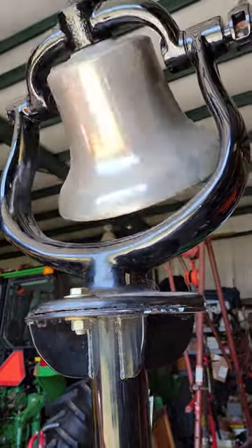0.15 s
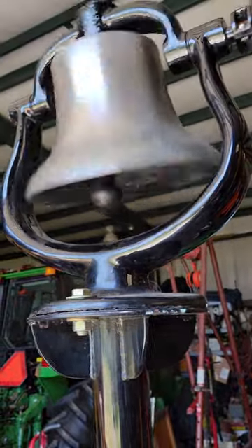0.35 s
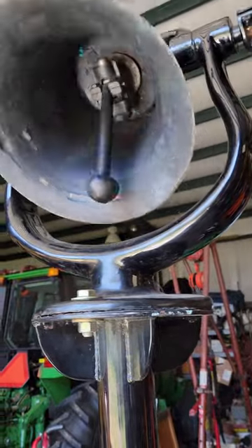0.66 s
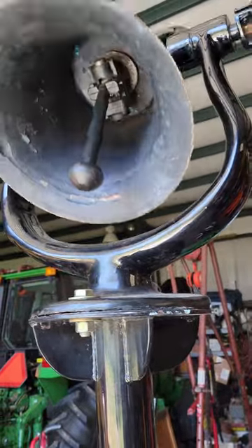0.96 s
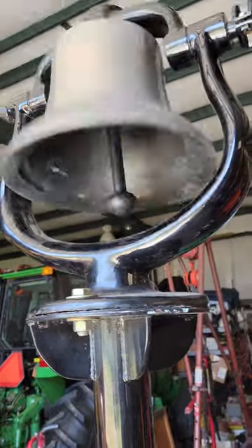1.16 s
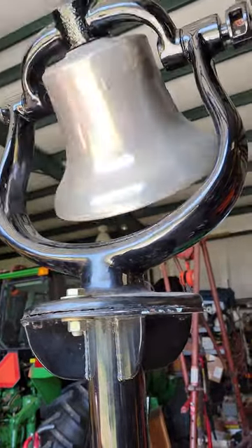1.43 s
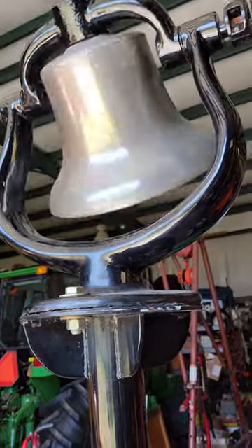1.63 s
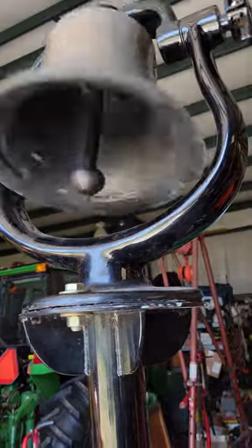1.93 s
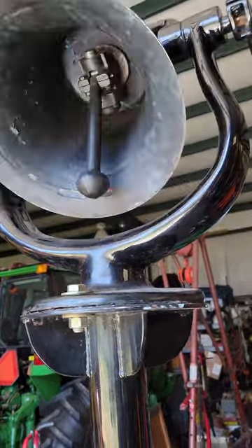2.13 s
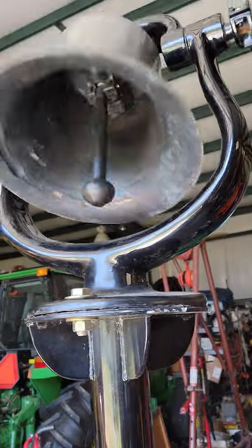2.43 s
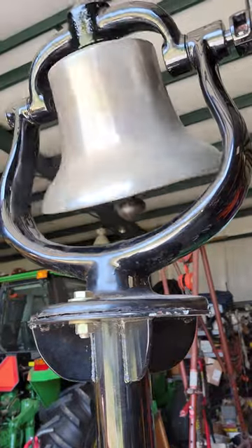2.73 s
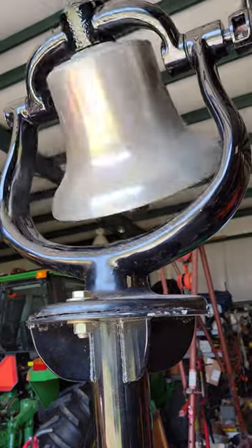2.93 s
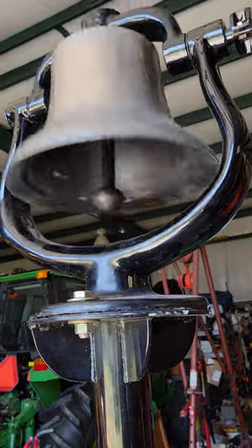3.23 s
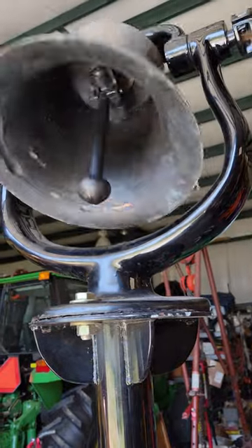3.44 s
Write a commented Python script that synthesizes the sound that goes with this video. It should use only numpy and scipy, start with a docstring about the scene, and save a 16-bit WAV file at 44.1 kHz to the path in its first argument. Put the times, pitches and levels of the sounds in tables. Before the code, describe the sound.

A metal bell tolls in a shed, two cracking clapper blows over a long wavering ring

```python
"""A cast metal bell swings in its yoke in a shed, close to the two microphones of a phone.
An earlier blow still rings: close pairs of partials beat, and their lobes sweep past as the mouth tilts.
Pivots tick and clunk, a loose part pings, then the clapper strikes with a crack and the yoke thuds.
The clapper touches again, faintly, and some low pairs dip; more ticks, a second blow, and it rings on.
Shaped noise makes the shed's faint hum, the cracks and the clunks; decaying sines make the rest."""
import sys
import numpy as np
from scipy import signal
from scipy.fft import rfft, irfft
from scipy.io import wavfile
from scipy.ndimage import uniform_filter1d

SR = 44100
rng = np.random.default_rng(int(sys.argv[2]) if len(sys.argv) > 2 else 0)


def store_wav(level_fs):
    """Save 16-bit WAV to argv[1]."""
    pcm = np.round(np.clip(np.atleast_2d(level_fs), -1, 1) * 32767)
    wavfile.write(sys.argv[1], SR, pcm.T.astype(np.int16))


def makeup_ratio(level_db):
    """Linear amplitude ratio for a level in decibels (20 dB per factor of ten)."""
    decades = np.asarray(level_db, float) / 20
    return 10 ** decades


N = 157878

# clapper blows, the first before the start: start_s, strength_db
BLOWS = [(-.66, 0), (.7975, 0), (2.2815, 0)]


def noise(points, size):
    """Two unrelated noises coloured by (Hz, relative dB) points, scaled to rms 1."""
    point_hz, point_db = np.array(points, float).T
    bin_hz = np.arange(size // 2 + 1) * SR / size + 1  # 1 Hz up, so that the log exists
    colour = makeup_ratio(np.interp(np.log(bin_hz), np.log(point_hz), point_db))
    pair = irfft(rfft(rng.standard_normal((2, size))) * colour, size)
    return pair / pair.std()


def fade(t60, size):
    """Exponential decay, 60 dB down after t60 seconds."""
    return makeup_ratio(-60 * np.arange(size) / SR / t60)


def waver(size, order):
    """Gain that wanders at random around 1; a longer order (samples) gives longer swells."""
    depth = 0.8
    slow = uniform_filter1d(uniform_filter1d(rng.standard_normal(size), order), order)
    return 1 + depth * slow / slow.std()


def add(out, sound, start_s):
    """Mix a sound in at start_s, cut at the end of the scene."""
    i = int(start_s * SR)
    out[:, i:i + sound.shape[1]] += sound[:, :N - i]


def microphones(mid_side, side_hz):
    """Mid and side to left and right; the side loses its bass, which is alike at both microphones."""
    high_pass = signal.butter(1, side_hz, "high", fs=SR, output="sos")
    side = signal.sosfilt(high_pass, mid_side[1])
    return mid_side[0] + side * np.array([[1], [-1]])


def shed_echo(sound):
    """Diffuse echo of roof and walls: a fading noise tail, dull in the treble."""
    size, t60_s, gain_db = 32768, 0.31, -5
    tail = noise([(200, 0), (4000, -3), (16000, -24)], size) * fade(t60_s, size)
    tail[:, :200] = 0  # samples before the first reflection
    tail /= np.sqrt((tail ** 2).sum(axis=1, keepdims=True))
    return signal.fftconvolve(sound, tail, axes=1)[:, :N] * makeup_ratio(gain_db)


def shed_air():
    """Faint steady hum of the shed: coloured noise with a narrow bass."""
    # colour of the air: frequency_hz, relative_db
    air_colour = [(25, -19), (45, -11.5), (70, 3), (120, -5.5), (260, -9.5), (305, -1.5), (350, -9.5),
                  (700, -19.5), (1300, -19.5), (2200, -25), (4000, -36), (7000, -53.5), (12000, -58.5)]
    level_db, side_hz = -62.5, 150
    return makeup_ratio(level_db) * microphones(noise(air_colour, N), side_hz)


def struck_modes(modes, t60, size):
    """Wavering struck modes: strength varies by touch, phase also between mid and side."""
    scatter_db = 2.5
    mode_hz, mode_db = np.array(modes, float).T[:, :, None, None]
    phase = rng.random((len(modes), 2, 1))
    scatter = rng.standard_normal((len(modes), 1, 1))
    sines = np.sin(2 * np.pi * (mode_hz * np.arange(size) / SR + phase))
    tones = makeup_ratio(mode_db + scatter_db * scatter) * sines
    return sum(tone * waver(size, order=300) for tone in tones) * fade(t60, size)


def contact_rise(size):
    """Linear onset of a contact, over 2.4 ms."""
    return np.minimum(np.arange(size) / SR / 0.0024, 1)


def yoke_pings(out):
    """A loose part of the yoke pings and rings at a few modes."""
    # pings: start_s, level_db
    ping_times = [(.684, -61), (1.502, -69), (2.068, -67.5), (3.454, -69.5)]
    # modes of the loose part: frequency_hz, relative_db
    ping_modes = [(4810, -1), (7100, -0.5), (10200, -9)]
    size, t60_s = 8192, 0.2
    for start_s, level_db in ping_times:
        ping = struck_modes(ping_modes, t60_s, size)
        add(out, makeup_ratio(level_db) * ping * contact_rise(size), start_s)


def pivot_ticks(out):
    """At each touch the pivot's modes tick, its surfaces grate, and a duller noise clunks."""
    # touches of the pivots: start_s, tick_db, clunk_db
    touches = [(0.09, -59, -59), (0.683, -54.5, -56.5), (0.694, -49.5, -46.5), (1.109, -50.5, -49.5),
               (1.488, -59, -56), (2.051, -78, -52.5), (2.121, -59.5, -56), (2.144, -59, -61),
               (2.929, -59, -60), (3.049, -71, -59.5), (3.43, -68, -50.5)]
    # modes of the pivot: frequency_hz, relative_db
    pivot_modes = [(3260, 1), (5050, 2.5), (5810, -6), (7400, -6), (9200, -9)]
    # colour of the grating: frequency_hz, relative_db
    grit_colour = [(1800, -24.5), (5000, 0), (9000, -25)]
    # colour of the clunk: frequency_hz, relative_db
    clunk_colour = [(400, -55), (600, -25), (850, 0.5), (1250, 0), (1550, -26.5), (2060, -5.5),
                    (2500, -29.5), (4000, -60)]
    size = 8192
    tick_t60_s, grit_t60_s, clunk_t60_s = 0.04, 0.091, 0.3
    grit_db = -4  # below the tick level
    rise = contact_rise(size)
    for start_s, tick_db, clunk_db in touches:
        grit = makeup_ratio(grit_db) * noise(grit_colour, size) * fade(grit_t60_s, size)
        tick = struck_modes(pivot_modes, tick_t60_s, size) + grit
        clunk = noise(clunk_colour, size) * fade(clunk_t60_s, size)
        add(out, makeup_ratio(tick_db) * tick * rise, start_s)
        add(out, makeup_ratio(clunk_db) * clunk * rise, start_s)


def yoke_thuds(out):
    """Yoke and post answer each blow with low, wavering tones, alike at both microphones."""
    # tones of yoke and post: frequency_hz, level_db (before the waver), t60_s
    yoke_tones = [(91, -44.5, 0.72), (195.4, -44.5, 0.45), (302.6, -46.5, 0.65)]
    size, rise_s = SR // 2, 0.006
    age = np.arange(size) / SR
    for start_s, strength_db in BLOWS[1:]:
        thud = np.zeros(size)
        for tone_hz, level_db, t60_s in yoke_tones:
            tone = makeup_ratio(level_db) * np.sin(2 * np.pi * tone_hz * age)
            thud += tone * fade(t60_s, size) * waver(size, order=900)
        thud *= makeup_ratio(strength_db) * (1 - np.exp(-age / rise_s))
        add(out, np.array([thud, 0 * thud]), start_s)  # mid only


def clapper_cracks(out):
    """The clapper's contact at each blow: a short burst of coloured noise."""
    # colour of the crack: frequency_hz, relative_db
    crack_colour = [(100, -44), (290, -1), (500, -16.5), (1200, 3.5), (2200, -4), (3000, -12), (4200, -9),
                    (6300, -2), (8300, -20.5), (12000, -18.5), (16000, -22)]
    size, level_db, t60_s = 8192, -11.5, 0.035
    for start_s, strength_db in BLOWS[1:]:
        crack = noise(crack_colour, size) * fade(t60_s, size)
        add(out, makeup_ratio(strength_db + level_db) * crack * np.sqrt(contact_rise(size)), start_s)


def knocks():
    """All knocks of pivots, yoke and clapper as mid and side, with their echo, at the microphones."""
    echo_db, side_hz = -10, 600
    hits = np.zeros((2, N))
    yoke_pings(hits)
    pivot_ticks(hits)
    yoke_thuds(hits)
    clapper_cracks(hits)
    return microphones(hits + makeup_ratio(echo_db) * shed_echo(hits), side_hz)


def swarm(count):
    """Weak partials crowding the treble, shorter the higher: (Hz, dB before upper_ring's gain, t60 s)."""
    low_hz, high_hz = 3695, 15500
    top_db, tilt_db_per_octave, low_t60_s = -54.5, -0.5, 1.3
    place, weakness = rng.random((count, 2)).T
    partial_hz = low_hz + place * (high_hz - low_hz)
    partial_db = top_db + tilt_db_per_octave * np.log2(partial_hz / low_hz) - 8 * weakness
    return list(zip(partial_hz, partial_db, low_t60_s * low_hz / partial_hz))


def upper_ring(t, tilt):
    """Fast-fading beating pairs, with more lobes the higher they are."""
    # pitches of the upper partials: pitch_hz
    upper_hz = [1578.8, 2054, 2254, 2535, 2589.5, 2589, 2673, 2701, 3230, 3416, 3553.5, 3572, 3919, 4065,
                4260, 4360, 4452, 4619.5, 4638, 5069, 5755, 5793, 6060, 6304, 6375, 6340, 6944, 6988, 7391,
                7927, 8175, 9270, 9421, 9911, 10750, 12110, 12400, 13375, 14080]
    # the same partials: level_db (before gain_db and the blow), t60_s (until the clapper rests)
    upper_decays = [(-51.5, 3), (-41.5, 0.62), (-41.5, 0.31), (-48.5, 2.2), (-33.5, 1.61), (-58.5, 5.2),
                    (-46, 1), (-43.5, .74), (-59, 0.42), (-47.5, 1.3), (-29, 1.06), (-39, 1.21),
                    (-55.5, 0.67), (-50, 1.2), (-45.5, 1), (-49, 0.9), (-46, 1.1), (-31, .94), (-47, 1.3),
                    (-53.5, 0.41), (-38.5, .65), (-35, 0.95), (-53, 1.3), (-46, 1), (-45, .8), (-29, 0.23),
                    (-52.5, 0.58), (-46, .73), (-60.5, 0.73), (-56.5, 0.85), (-57, 0.91), (-59.5, 0.91),
                    (-53, .52), (-42, 0.32), (-56, 0.39), (-63, .56), (-59, .47), (-28.5, 0.15), (-35, .2)]
    # the clapper touches again: start_s, strength_db
    rebounds = [(1.11, -32)]
    gain_db, rise_s = 12.5, 0.0028
    split_share = 0.001986  # pair spacing over pitch, before a random factor
    lobes_per_khz, lobe_fill = 2.315, 0.51  # lobe phase in radians per unit tilt; partner's share
    rest_s, free_damp = 0.7, 0.65  # the clapper leans on the bell, then the decay slows to this share
    partials = [(pitch_hz, *row) for pitch_hz, row in zip(upper_hz, upper_decays)]
    out = np.zeros((2, N), np.float32)
    for pitch_hz, partial_db, t60_s in partials + swarm(count=90):
        db_per_s = 60 / t60_s
        split_hz = split_share * pitch_hz * (0.32 + rng.random())
        lobe_turn = rng.random((2, 1))
        for start_s, strength_db in BLOWS + rebounds:
            beat_turn = rng.random((2, 1))
            i = max(int(start_s * SR), 0)
            age = t[i:] - start_s
            damped_s = np.minimum(age, rest_s) + free_damp * np.maximum(age - rest_s, 0)
            level_db = partial_db + strength_db + gain_db - db_per_s * damped_s
            n = np.searchsorted(-level_db, 100)  # stop at -100 dB
            age = age[:n]
            phase = (2 * np.pi * pitch_hz * age % (2 * np.pi)).astype(np.float32)
            lobe = lobes_per_khz * pitch_hz / 1000 * tilt[i:i + n] + 2 * np.pi * lobe_turn
            lobe = lobe.astype(np.float32)
            beat = (2 * np.pi * (split_hz * age + beat_turn)).astype(np.float32)
            loud = (makeup_ratio(level_db[:n]) * (1 - np.exp(-age / rise_s))).astype(np.float32)
            pair = np.cos(lobe) * np.sin(phase) + lobe_fill * np.sin(phase + beat)
            out[:, i:i + n] += loud * pair
    return out


def low_ring(t, tilt):
    """Four loud beating pairs; each member's lobes follow the tilt by a cubic through four points."""
    # low pairs: main_hz, partner_offset_hz, decay_db_per_s, diffuse_amplitude (signed),
    # right_beat_later_s, right_phase_cycles
    low_pairs = [(507.6, 3.82, .3, .001, .087, .04), (975.6, 2.73, 2.5, .001, .198, .83),
                 (1103.5, -2.96, 1.0, -.0334, .004, .4), (1753.3, 3.52, 25.6, .056, .005, .24)]
    # one row a blow, ring level of the four pairs: pair1_db, pair2_db, pair3_db, pair4_db
    ring_levels = [(0, -2, 1, 0.085), (3, -0.5, 1, -0.82), (-2, -6.5, -0.26, -1.1)]
    # one row a blow, time of a beat crest (left): pair1_s, pair2_s, pair3_s, pair4_s
    beat_crests = [(.124, .007, .26, .273), (.996, 1.083, 1.022, 1.062), (2.374, 2.537, 2.48, 2.365)]
    # signed lobe amplitude at four tilts: at_1, at_0.5, at_-0.5, at_-1
    # rows of each pair: left main, left partner, right main, right partner
    lobe_points = [(-0.0164, 0.0094, -0.0012, -0.0017), (-0.0075, 0.045, 0.11, 0.099),
                   (0.0074, -0.0054, 0.0011, -0.0004), (-0.032, -0.0136, -0.027, -0.036),
                   (0.17, 0.021, 0.17, 0.12), (0.0348, 0.0114, 0.0274, 0.11), (0.11, 0.034, 0.071, 0.14),
                   (-0.0267, -0.0116, -0.0145, -0.04), (0.037, 0.029, -0.094, -0.081),
                   (0.07, 0.061, 0.0077, 0.11), (0.087, -0.074, 0.15, 0.11), (-0.045, -0.13, -0.017, -0.12),
                   (-0.1091, -0.4, -0.12, -0.0086), (-0.37, 0.1252, -0.037, -0.01),
                   (-0.054, -0.67, -0.13, -0.024), (-0.41, 0.15, -0.01, -0.054)]
    bloom_s = 0.007  # a low pair takes up a blow gradually
    dip_s, dip_width_s, dip_db = 1.125, 0.022, -15.5  # brief dip after the rebound
    blow_s = np.array(BLOWS)[:, 0]
    blow = np.searchsorted(blow_s, t, side="right") - 1  # latest blow at each moment
    lobes = np.reshape(lobe_points, (4, 2, 2, 4))  # pair, microphone, member, tilt
    keep = np.exp(-1 / (bloom_s * SR))
    dip = makeup_ratio(dip_db * np.exp(-((t - dip_s) / dip_width_s) ** 2))
    out = np.zeros((2, N))
    for k, (main_hz, split_hz, decay, diffuse, later_s, right_cycles) in enumerate(low_pairs):
        loud = makeup_ratio(np.array(ring_levels)[blow, k] - decay * (t - blow_s[blow]))
        crest_s = np.array(beat_crests)[blow, k]
        tone = np.exp(2j * np.pi * (main_hz * t + rng.random()))
        for c in range(2):  # left, right
            main, partner = (np.polyval(np.polyfit([1, .5, -.5, -1], points, 3), tilt)
                             for points in lobes[k, c])
            beat = np.exp(2j * np.pi * (split_hz * (t - crest_s - c * later_s)))
            # the highest pair dips on both sides, the next one on the right only
            dips = main_hz > 1500 or c * (main_hz > 1000)
            reach = loud * dip ** dips * (main + 1j * diffuse + partner * beat)
            reach = signal.lfilter([1 - keep], [1, -keep], reach, zi=[keep * reach[0]])[0]
            out[c] += (reach * tone * np.exp(2j * np.pi * c * right_cycles)).real
    return out


def scene():
    """Air of the shed, knocks, and the swinging bell with the echo of its upper partials."""
    swing_s, facing_s = 1.435, 0.9  # period; a moment of tilt 1
    t = np.arange(N) / SR
    tilt = np.cos(2 * np.pi * (t - facing_s) / swing_s)
    bright = upper_ring(t, tilt)
    return shed_air() + knocks() + shed_echo(bright) + bright + low_ring(t, tilt)


def roll_off(x):
    """The treble ends steeply here."""
    return signal.sosfilt(signal.butter(12, 15720, fs=SR, output="sos"), x)


def record(dry):
    """The microphones' signal clips at full scale."""
    clipped = np.clip(dry, -1, 1)
    return roll_off(clipped)


dry = scene()
out = record(dry)
store_wav(out)
```